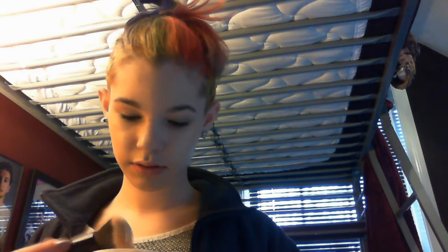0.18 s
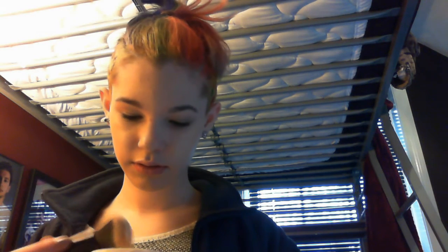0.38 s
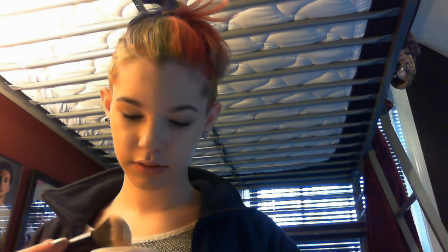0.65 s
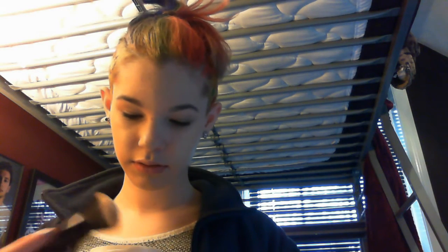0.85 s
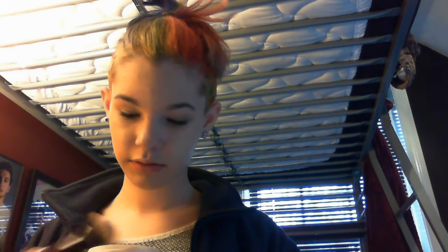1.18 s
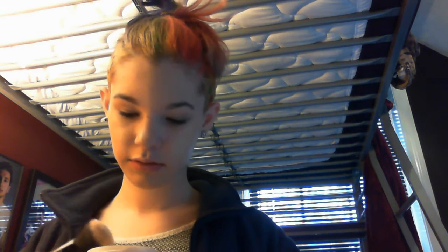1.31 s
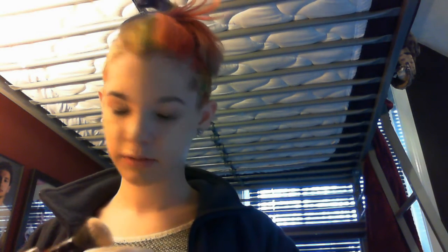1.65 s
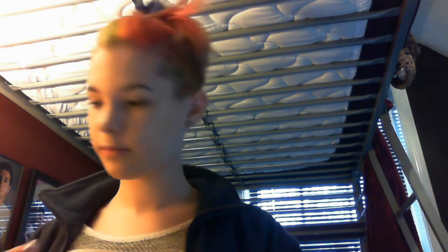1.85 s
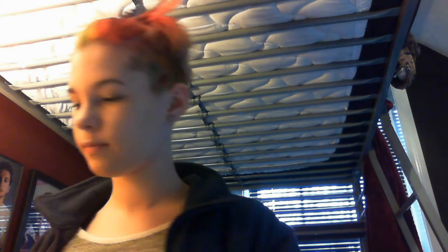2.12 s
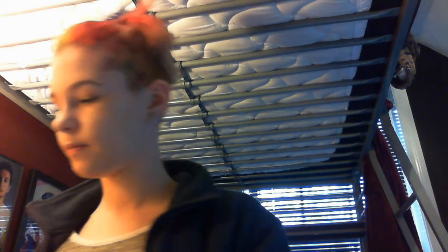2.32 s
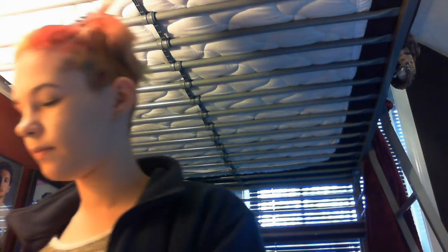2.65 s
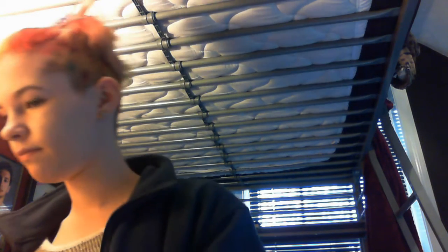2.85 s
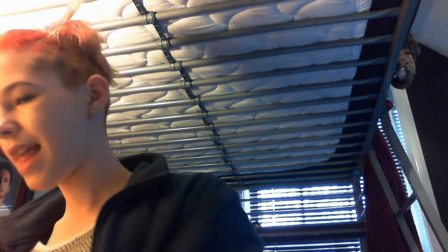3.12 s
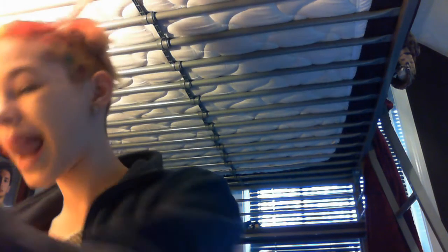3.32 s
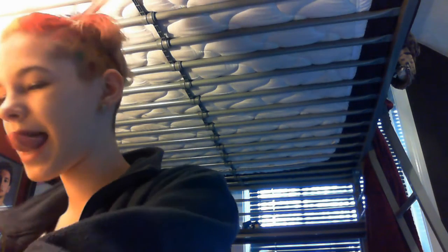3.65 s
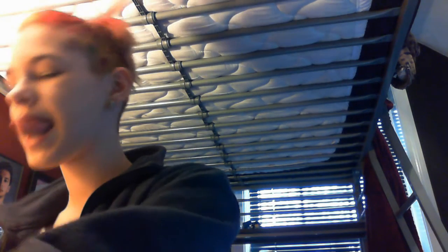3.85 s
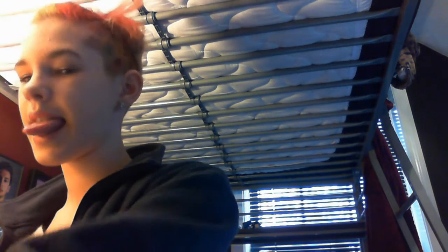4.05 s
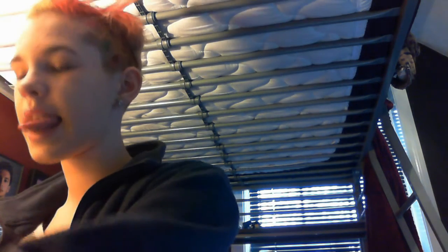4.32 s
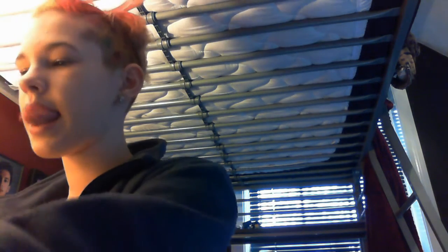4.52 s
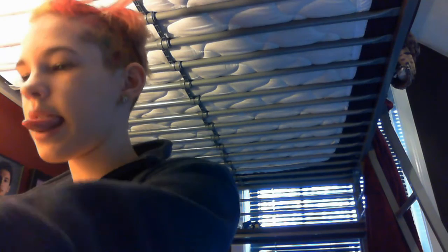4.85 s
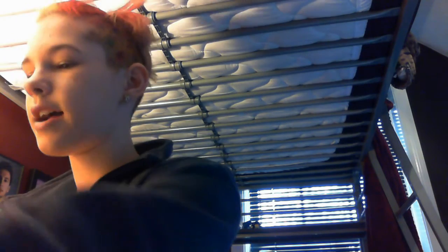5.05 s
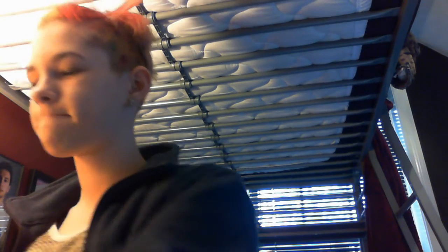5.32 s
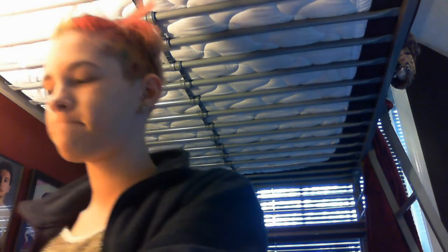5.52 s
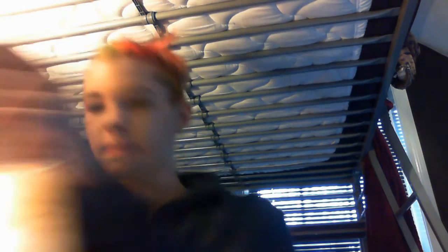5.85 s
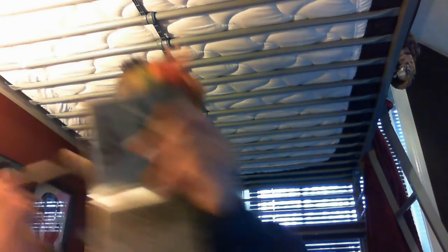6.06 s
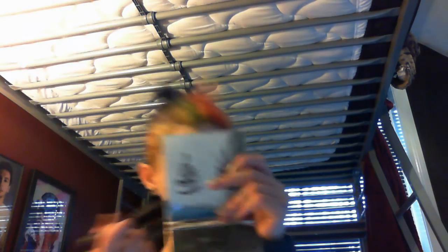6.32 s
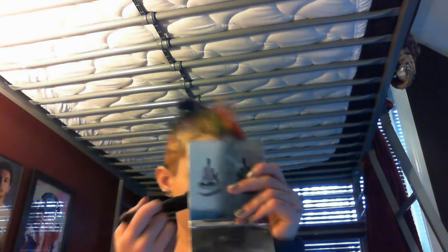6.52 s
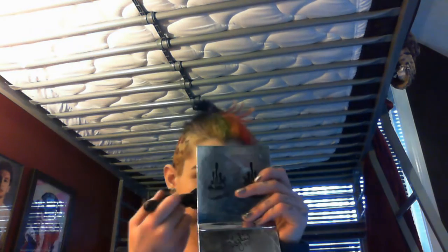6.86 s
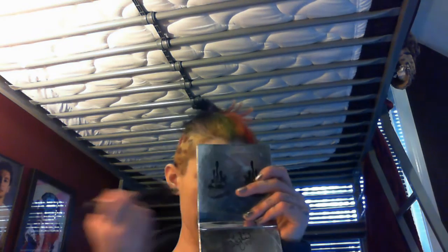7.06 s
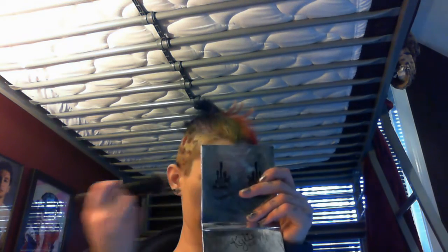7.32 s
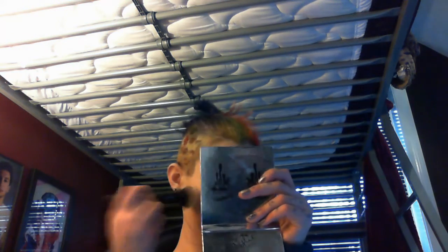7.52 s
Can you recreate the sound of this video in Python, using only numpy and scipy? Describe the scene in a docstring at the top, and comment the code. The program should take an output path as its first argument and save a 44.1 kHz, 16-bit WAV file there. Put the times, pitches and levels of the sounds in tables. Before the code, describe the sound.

In a small bedroom, a small brush taps hard plastic, then a box is pulled from clutter with hollow knocks and rustles; a thin electronic whine pulses.

```python
"""A brush handle taps a plastic compact in a small bedroom; each tap is a set of fading tones plus a snap.
Then a box is picked out of a heap of things: ringing knocks, and shaped noise for scrapes and rustles.
A webcam microphone, mono, adds hiss and rumble as noise. Its data traffic leaks in as an 8 kHz whine
with hiss, stronger in bursts, four in each third of a second. Very faint noise gives slight stereo width."""
import sys
import numpy as np
from scipy import signal
from scipy.fft import rfft, irfft, next_fast_len
from scipy.io import wavfile
from scipy.ndimage import uniform_filter1d, map_coordinates

SR = 44100
rng = np.random.default_rng(int(sys.argv[2]) if len(sys.argv) > 2 else 0)


def wav_out(sig):
    """Save sig, one row per channel (or a flat mono array), as 16-bit PCM at SR to the path in sys.argv[1]."""
    wavfile.write(sys.argv[1], SR, np.round(np.clip(np.atleast_2d(sig).T, -1, 1) * 32767).astype(np.int16))


N = 338688

# Spectrum levels and tone levels are relative; t60_s is the time a tone takes to fade by 60 dB.
# Microphone noise: pitch_hz, level_db
FLOOR = [(8, -12.5), (20, -1), (49, -10), (80, -17.5), (110, -23), (200, -28), (350, -31.5), (600, -36.5),
         (1500, -40), (4000, -41.5), (6000, -38.5), (10000, -41.5), (16000, -40.5)]
# Faint noise, different left and right, that gives slight stereo width: pitch_hz, level_db
SIDE_NOISE = [(12, -26), (20, 0.5), (277, -3.5), (1330, -17.5), (2670, -20.5), (7730, -35.5), (11800, -21),
              (16000, -25)]
# Hiss of the data traffic: pitch_hz, width_hz, level_db
TRAFFIC_HISS = [(5190, 180, 3), (6280, 630, -0.5), (6670, 270, -5.5), (8630, 230, 5.5)]
# Bursts in one traffic cycle, lengths before random spread: length_s, whine_db, hiss_ahead_s
BURSTS = [(.052, 0, .03), (0.026, 0, .014), (0.038, -0.5, 0.016), (0.029, 0.5, .014)]
# How fast the bedroom's echo dies: pitch_hz, t60_s
BEDROOM = [(200, 0.21), (1000, 0.21), (4000, 0.17), (12000, 0.13)]
# First echoes from the walls: delay_s, level_db
WALLS = [(0.0121, -15), (0.016, -22), (0.022, -22), (.027, -19.5)]
# Hands at work in the heap, joined by straight lines: start_s, sliding_db, push_on_bed_db
HANDLING = [(2.5, -70, -56), (2.75, -75.5, -48.5), (2.95, -63, -39.5), (3.079, -62, -48),
            (3.17, -62, -38.5), (3.45, -64, -49), (3.7, -56, -53), (3.92, -52, -43.5), (4.3, -61.5, -49.5),
            (4.62, -53, -44.5), (4.95, -58, -53), (5.2, -59.5, -43), (5.43, -53.5, -37.5),
            (5.622, -68, -49), (6.0, -72, -73), (6.5, -73, -52)]
# Single strokes of a hand or case over card and cloth: start_s, length_s, scrape_db, rustle_db
STROKES = [(2.912, 0.022, -40.5, -36), (2.935, 0.05, -55, -44), (2.958, 0.37, -84, -50),
           (3.02, 0.091, -62, -47.5), (3.127, 0.035, -44.5, -47.5), (3.342, 0.094, -44.5, -48),
           (3.545, 0.12, -43.5, -49), (3.67, 0.069, -52.5, -57.5), (3.867, 0.066, -53, -60),
           (4.174, 0.12, -58.5, -47.5), (4.326, 0.072, -40, -41.5), (4.536, 0.072, -45.5, -38.5),
           (4.634, 0.088, -58, -61.5), (4.73, 0.075, -59.5, -61), (4.811, 0.06, -54, -54.5),
           (4.868, 0.069, -55.5, -46.5), (5.022, 0.035, -61, -48), (5.133, 0.023, -45.5, -62),
           (5.321, 0.046, -42, -43), (5.362, 0.057, -41.5, -42.5), (5.545, 0.08, -55.5, -49.5),
           (6.173, 0.063, -49.5, -57)]
# Colour of the scraping: pitch_hz, level_db
SCRAPE = [(100, -40.5), (200, -10), (330, -1.5), (600, -0.5), (1000, -4.5), (1600, -12.5), (2500, -13),
          (5000, -16.5), (14000, -26)]
# Colour of the rustling: pitch_hz, level_db
RUSTLE = [(1200, -13), (2500, -7), (4000, -10), (6000, -5), (8000, 1), (10500, -5.5), (13000, -16.5),
          (16000, -19.5)]
# Colour of the thuds through the bed: pitch_hz, level_db
THUD = [(10, -7), (25, 9), (50, 2), (100, -13), (200, -23.5), (400, -68)]
# Faint ringing of rubbed card: pitch_hz, width_hz, level_db
CARD = [(4680, 57, -5.5), (6640, 38, 8), (7500, 58, 0), (7970, 81, -8), (8700, 27, -3), (9720, 41, -11),
        (10800, 110, -7)]
# Boxes and cases knock together; snap and thump are relative to the ring, the snap before a shared lift:
# start_s, level_db, strongest_hz, softness_db_per_octave, snap_db, thump_db
KNOCKS = [(2.908, -32.5, 413, -2, 4, 5), (2.946, -38.5, 500, 3, 0, -1), (2.981, -42.5, 2100, -7, -2, -1),
          (3.1639, -7, 790, 4.5, -34, -18), (3.348, -31, 560, 3, -11, -8),
          (3.533, -23.5, 615, 0.5, -13.5, -13), (4.112, -33, 705, 4, -22, -17),
          (4.327, -17, 764, 2.5, -13.5, -14.5), (4.533, -38, 1210, 1, -14, -25),
          (4.566, -24, 1027, 2, -12, -28), (4.577, -28.5, 890, 0.5, -7, -20), (4.764, -38, 500, 2, -25, -6),
          (4.942, -41, 890, 8, -13, -24), (5.109, -37, 420, 11, -25, -8), (5.141, -43, 800, -5, 5.5, -3.5),
          (5.278, -32.5, 475, -0.5, -28, -4), (5.391, -22.5, 402, 3, -12, -4),
          (5.51, -20, 422, 9.5, -29, -7.5), (6.182, -38, 880, 3, -9, -14), (6.244, -49, 3400, 2, -20, -30),
          (6.259, -48.5, 1250, 5, -16, -30), (6.35, -48, 704, 0, 2, -20)]
# Tones of the box: pitch_hz, level_db, t60_s
BOX = [(301, 4, 0.05), (400, 2, 0.025), (558.6, 0.5, 0.055), (721, -1.5, 0.045), (955, -3.5, 0.039),
       (1213, -6, 0.053), (1482, -1.5, 0.024), (1803, -6.5, 0.015), (1985, -7.5, 0.029), (2580, -3.5, 0.03),
       (3000, -9.5, 0.0084), (3580, -12.5, 0.0088)]
# Brush on the compact, before a small shared delay; the snap is relative to the ring, before a shared lift:
# start_s, level_db, softness_db_per_octave, snap_db
TAPS = [(0.043, -18, 1.5, -15), (0.237, -12, 0, -9.5), (0.404, -14.5, 1, -10), (0.57, -13.5, 0.5, -9),
        (1.082, -9.5, 4, -3), (1.415, -45, 11, -2.5), (1.581, -38, 21, -5.5), (1.606, -26, 9.5, -6)]
# Tones of the compact: pitch_hz, level_db, t60_s
COMPACT = [(299, -5, 0.028), (400, -2, 0.0099), (559, -5.5, 0.014), (846, 2, 0.0055), (915, -0.5, 0.011),
           (1445, -11, 0.009), (1792, -19.5, 0.024), (2133, -14, 0.0073)]
# Tones of the brush handle: pitch_hz, level_db, t60_s
HANDLE = [(3096, 0.5, 0.019), (5890, 7.5, 0.0094), (7660, 4.5, 0.02), (9630, 4.5, 0.016)]

WHINE_HZ, TOP_HZ = 8000, 15850  # whine pitch; upper limit of the whole sound
# A cycle has five slots, the last one idle; a burst ends on the nearest tick of a timer.
CYCLE_S, FIRST_END_S, TICK_S = 0.3338, 0.250, 0.016
PACKET_HZ, PACKET_PEAK_S = 98.44, 0.002  # packet rate; time of a packet's peak
SLOPE_DB, DULL_DB = 6.5, -9  # fall per octave from the strongest tone; noisy part before softness
RUSTLE_DB, RUSTLE_HZ = -2.5, 6600  # cloth against the sliding; middle of a stroke's rustle
CRACKLES_PER_S, CRACKLE_DB = 62, 25.5  # fine crackles in the rustle; level before smearing
RATTLE_DB, RATTLE_HZ = 12, 600  # highest level of small knocks over the sliding; middle pitch


def amp(db):
    """Gain of a level in dB."""
    return 10 ** (np.asarray(db) / 20)


def unit(x):
    """x scaled to an average (rms) level of 1."""
    return x / np.sqrt(np.mean(x ** 2) + 1e-20)


def along(points, hz):
    """Reads a (pitch, value) curve at any pitch, on a log pitch axis."""
    point_hz, values = np.transpose(points)
    return np.interp(np.log(hz + 1), np.log(point_hz + 1), values)


def wobble(rate):
    """A smooth random curve through a given number of random points a second."""
    points = rng.standard_normal(int(N * rate / SR) + 4)
    return map_coordinates(points, [np.arange(N) * rate / SR])


def filtered(x, response):
    """Changes the strength and phase of each pitch in x."""
    size = next_fast_len(N + SR // 2)
    spectrum = rfft(x, size) * response(np.fft.rfftfreq(size, 1 / SR))
    return irfft(spectrum, size)[..., :N]


def coloured(x, spectrum):
    """Shapes x with a (pitch, dB) spectrum and brings it to rms 1."""
    return unit(filtered(x, lambda hz: amp(along(spectrum, hz))))


def band(x, low_hz, high_hz):
    """Keeps the pitches between two limits, using only past and present sound."""
    return signal.sosfilt(signal.butter(2, [low_hz, high_hz], "bandpass", fs=SR, output="sos"), x)


def steep_band(x, low_hz, high_hz):
    """The same band limits applied twice, for steeper edges."""
    return band(band(x, low_hz, high_hz), low_hz, high_hz)


def resonances(peaks):
    """Response of things that ring at certain pitches: each has a centre, a width and a level."""
    def response(hz):
        return sum(amp(db) * 1j * hz * width / (centre * centre - hz * hz + 1j * hz * width)
                   for centre, width, db in peaks)
    return response


def add(track, start_s, sound):
    """Mixes a sound into the track at a given second."""
    track[round(start_s * SR):][:len(sound)] += sound


def bedroom(tail_db):
    """Direct sound, first echoes and a tail in which each pitch dies at its own speed."""
    hz, t, noise = signal.stft(rng.standard_normal(SR // 3), SR, nperseg=256)
    fade = amp(-60 * t / along(BEDROOM, hz)[:, None])
    tail = signal.istft(noise * fade, SR, nperseg=256)[1]
    # The tail begins 300 samples after the direct sound.
    room = np.pad(amp(tail_db) * tail / np.linalg.norm(tail), (300, 0))
    room[0] = 1
    for delay_s, db in WALLS:
        room[round(delay_s * SR)] += amp(db)
    return room


def ringing(modes, weight_db, rise_s, scatter_db):
    """A struck thing sounds several fading tones of varied strength, peak 1; small things radiate no bass."""
    t = np.arange(SR // 4) / SR
    ring = np.zeros(len(t))
    for k, (hz, db, t60) in enumerate(modes):
        level_db = db + weight_db(hz) + rng.normal(0, scatter_db)
        ring += (-1) ** k * amp(level_db - 60 * t / t60) * np.sin(2 * np.pi * hz * t)
    ring = steep_band(ring * (1 - np.exp(-t / rise_s)), 200, 9000)
    return ring / np.abs(ring).max()


def snap(t60, low_hz):
    """The bright snap of first contact: a quickly fading burst of noise."""
    t = np.arange(SR // 4) / SR
    return band(rng.standard_normal(len(t)) * amp(-60 * t / t60), low_hz, 9270)


def microphone_noise():
    """The microphone's steady hiss and rumble, made from shaped noise."""
    return amp(-46.5) * coloured(rng.standard_normal(N), FLOOR)


def traffic():
    """Data traffic leaks in: the whine climbs through each burst in packets; a hiss starts just ahead."""
    t, load, busy = np.arange(N) / SR, np.zeros(N), np.zeros(N)
    for cycle in range(-1, int(N / SR / CYCLE_S) + 1):
        for slot, (usual_length, db, ahead) in enumerate(BURSTS):
            late, longer, size = rng.standard_normal(3)
            due = FIRST_END_S + CYCLE_S * (cycle + slot / (len(BURSTS) + 1)) + 0.0008 * late
            length = usual_length * (1 + 0.17 * longer)
            end = TICK_S * round(due / TICK_S)
            part = 1 + (t - end) / length  # 0 at the start of the burst, 1 at its end
            load += (part > 0) * (part < 1) * (0.78 + 0.83 * part) * amp(db + 1.0 * size)
            busy += (part > -ahead / length) * (part < 1) * (1 - 0.28 * np.clip(part, 0, 1))
    packets = 1 - 0.37 * (1 - np.cos(2 * np.pi * PACKET_HZ * (t - PACKET_PEAK_S)))
    load = uniform_filter1d(load, size=90) * packets
    whine_level = amp(-62.5 + 0.55 * wobble(25)) + amp(-53.0) * load
    whine = whine_level * np.sin(2 * np.pi * WHINE_HZ * t)
    flicker = amp(3.6 * wobble(110)) * rng.standard_normal(N)
    hiss = unit(filtered(flicker, resonances(TRAFFIC_HISS)))
    hiss_level = 0.12 + uniform_filter1d(np.minimum(busy, 1), size=200)
    return whine + amp(-59) * hiss_level * hiss


def slipping():
    """Surfaces slide in uneven slips, and the box sings along."""
    slips = coloured(amp(3.0 * wobble(45) + 1.97 * wobble(160)) * rng.standard_normal(N), SCRAPE)
    box_peaks = [(hz, 2.2 / t60, db) for hz, db, t60 in BOX]  # a quicker fade means a wider peak
    return unit(filtered(slips, lambda hz: 1.8 + resonances(box_peaks)(hz)))


def rustle_grains():
    """Cloth and card rustle as noise in uneven grains, with fine random crackles."""
    crackles = (rng.random(N) < CRACKLES_PER_S / SR) * amp(CRACKLE_DB + 4 * rng.standard_normal(N))
    level = amp(3.3 * wobble(60) + 2.2 * wobble(700)) + uniform_filter1d(crackles, size=24)
    return level * rng.standard_normal(N)


def handling():
    """Hands slide things with scrapes and rustles, and the bed carries thuds to the microphone."""
    start_s, sliding_db, push_db = np.transpose(HANDLING)
    t = np.arange(N) / SR
    scrape = amp(np.interp(t, start_s, sliding_db, -120, -120))
    push = amp(np.interp(t, start_s, push_db, -120, -120))
    grains = rustle_grains()
    rustle = amp(RUSTLE_DB) * scrape * coloured(grains, RUSTLE)
    bright = steep_band(grains, RUSTLE_HZ / 1.8, RUSTLE_HZ * 1.7)
    for s, length, scrape_db, rustle_db in STROKES:
        # Quick start, slower end.
        swell = np.sin(np.pi * np.linspace(0, 1, round(length * SR)) ** 0.64)
        add(scrape, s, amp(scrape_db) * swell)
        add(rustle, s, amp(rustle_db) * swell * unit(bright[round(s * SR):][:len(swell)]))
    rustle = filtered(rustle, lambda hz: 0.7 + 0.43 * resonances(CARD)(hz))
    thuds = coloured(amp(1.9 * wobble(6.1)) * rng.standard_normal(N), THUD)
    return rustle + scrape * slipping() + push * thuds


def rattle(count):
    """Small chance knocks, more often and louder where the hands are busy."""
    start_s, sliding_db, _ = np.transpose(HANDLING)
    t = np.arange(start_s[0], start_s[-1], 0.001)
    odds = np.cumsum(amp(np.interp(t, start_s, sliding_db)))
    when, softer, pitch = rng.random((count, 3)).T
    times = np.interp((np.arange(count) + when) / count, odds / odds[-1], t)
    levels_db = np.interp(times, start_s, sliding_db) + RATTLE_DB - 6 * softer
    pitches_hz = RATTLE_HZ * 2 ** (pitch - 0.5)
    return [(s, db, hz, 3, -12, -14) for s, db, hz in zip(times, levels_db, pitches_hz)]


def knocks():
    """Each knock meets another spot of the box, favours tones near its strongest and thumps the bed."""
    track, t = np.zeros(N + SR), np.arange(SR // 4) / SR
    for s, db, top_hz, soft_db, snap_db, thump_db in KNOCKS + rattle(count=10):
        def weight_db(hz):
            # Softness changes the fall only above the strongest tone.
            return -(SLOPE_DB + soft_db * (hz > top_hz)) * abs(np.log2(hz / top_hz))
        body = ringing(BOX, weight_db, 0.00038, scatter_db=2.5)
        dull = unit(steep_band(rng.standard_normal(len(t)), top_hz / 1.9, top_hz * 2.86))
        dull = dull * amp(DULL_DB - soft_db - 60 * t / 0.053)
        thump = unit(band(rng.standard_normal(len(t)), 105, 313))
        thump = thump * amp(-60 * t / 0.12) * (1 - np.exp(-t / 0.0089))
        blow = body + dull + amp(snap_db + 5.0) * snap(0.022, low_hz=3900) + amp(thump_db) * thump
        add(track, s, amp(db) * signal.fftconvolve(blow, bedroom(tail_db=-14.5)))
    return track[:N]


def taps():
    """The brush handle hits the same spot at the same place in the room, so the blows ring nearly alike."""
    track = np.zeros(N + SR)
    for s, db, soft_db, snap_db in TAPS:
        def weight_db(hz):
            # A softer tap is weaker in the tones above the lowest one.
            return -soft_db * np.log2(hz / COMPACT[0][0])
        body = ringing(COMPACT, weight_db, 0.0005, scatter_db=0.4)
        handle = ringing(HANDLE, lambda hz: 0, 0.0001, scatter_db=5.0)
        tick = 0.93 * snap(0.0089, low_hz=1690) + 0.64 * handle
        add(track, s + 0.0021, amp(db) * (body + amp(snap_db + 3.0) * tick))
    return signal.fftconvolve(track, bedroom(tail_db=-11.5))[:N]


def scene():
    """Everything reaches one microphone, whose sound is copied to two channels."""
    mono = microphone_noise() + traffic() + handling() + knocks() + taps()
    return np.tile(mono, (2, 1))


def record(dry):
    """Adds very faint noise, different left and right, and removes everything above the upper limit."""
    faint_noise = amp(-77.5) * coloured(rng.standard_normal(dry.shape), SIDE_NOISE)
    return filtered(dry + faint_noise, lambda hz: hz < TOP_HZ)


dry = scene()
out = record(dry)
wav_out(out)
```